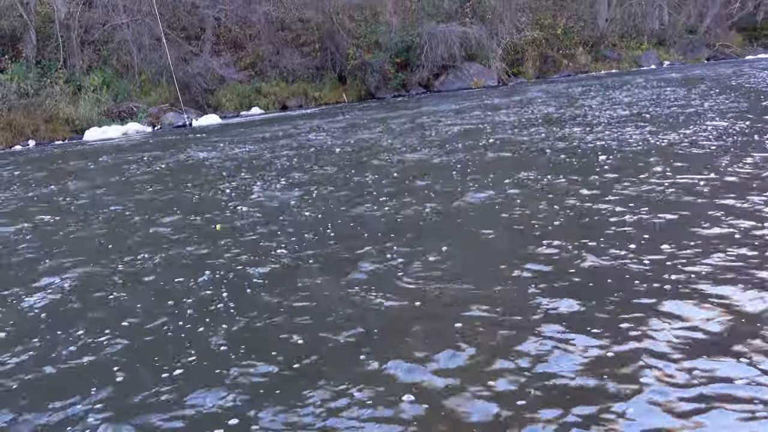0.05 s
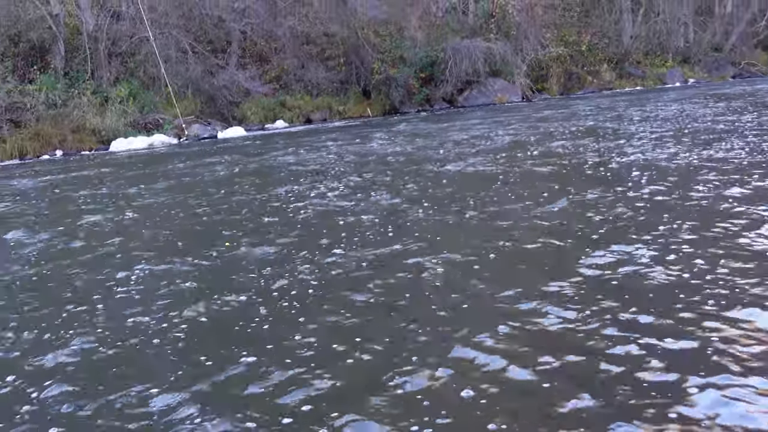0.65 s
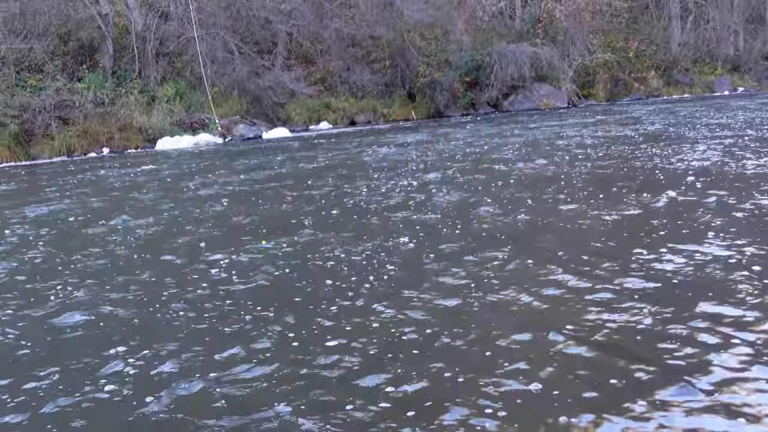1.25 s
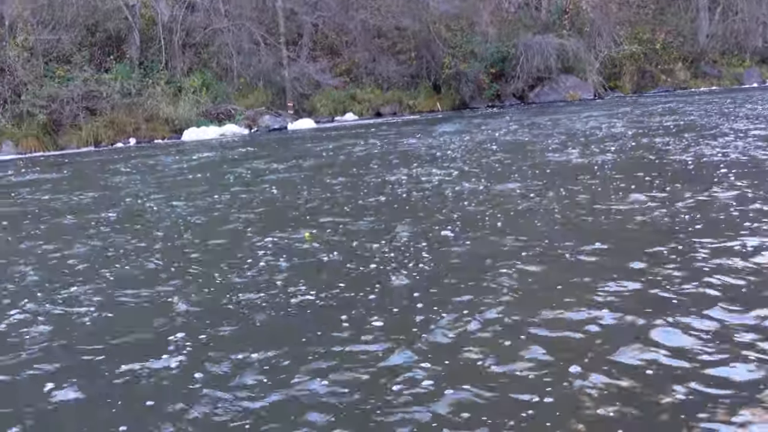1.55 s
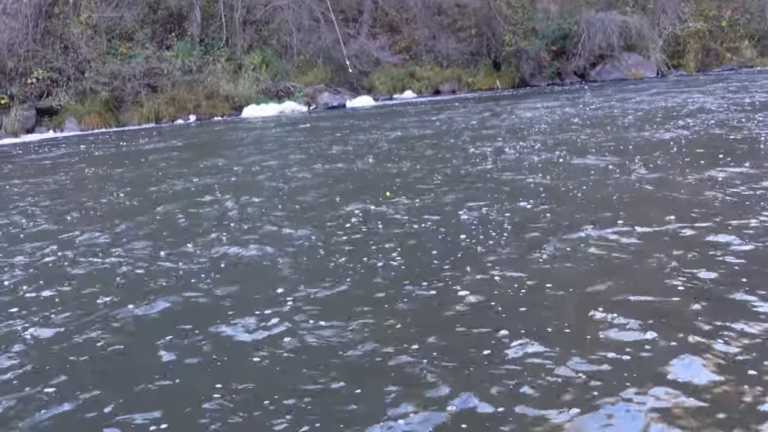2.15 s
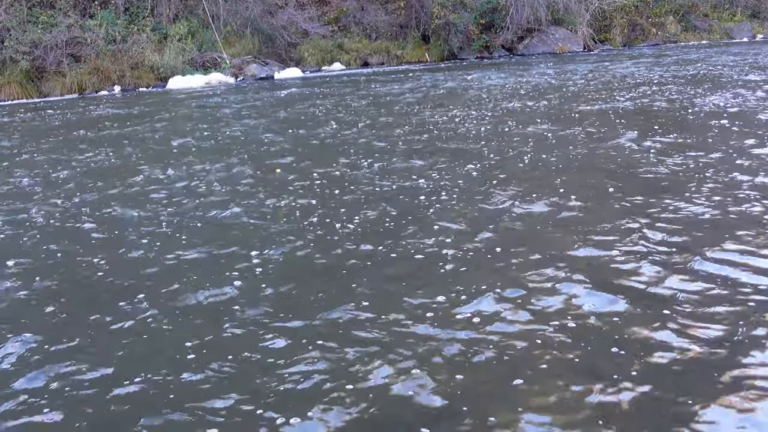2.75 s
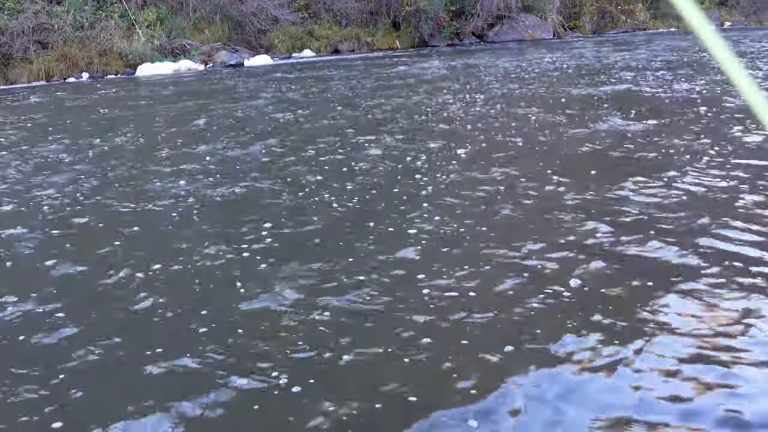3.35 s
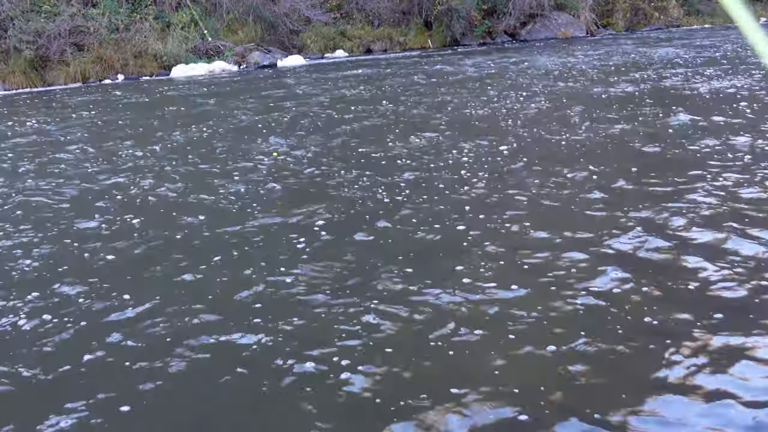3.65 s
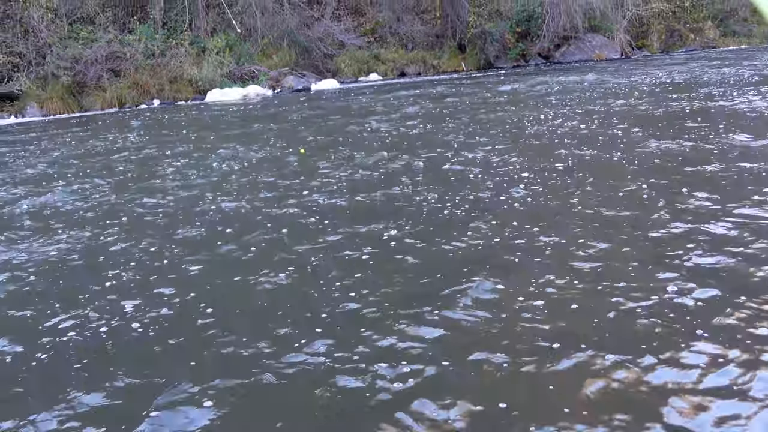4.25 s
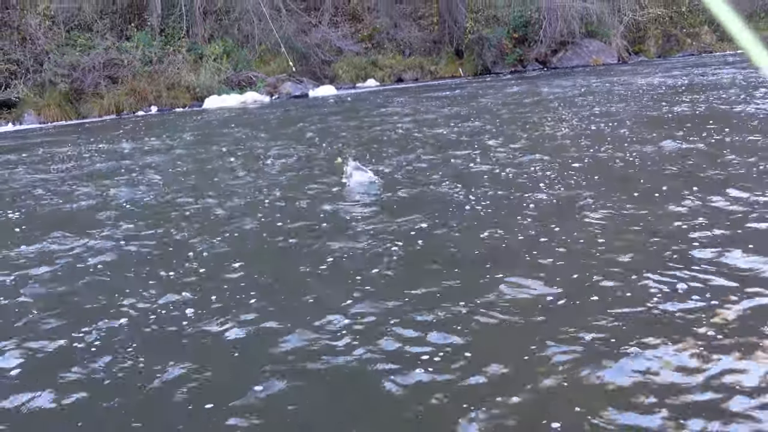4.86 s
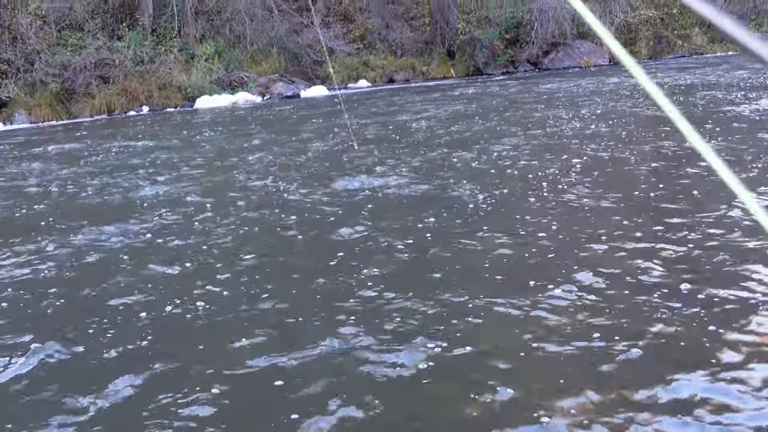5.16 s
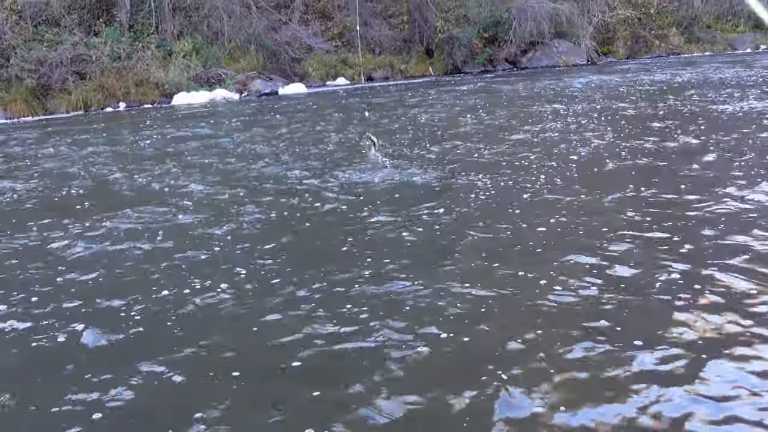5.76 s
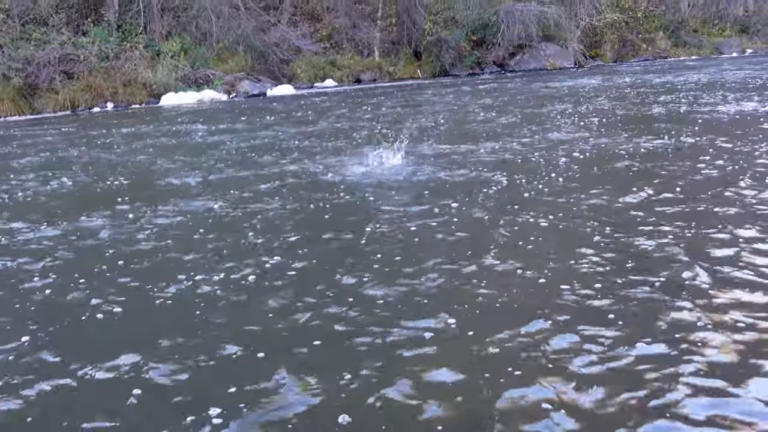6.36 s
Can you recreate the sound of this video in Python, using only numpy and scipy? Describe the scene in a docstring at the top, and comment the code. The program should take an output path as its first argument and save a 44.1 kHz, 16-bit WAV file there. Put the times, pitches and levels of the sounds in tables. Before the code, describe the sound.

A close fishing reel clicks and whirs in uneven spurts, then buzzes briefly before a fish splashes, over a soft river rush.

```python
"""River rush and a low breeze, then the clicking drag of a close spinning reel: an angler plays a fish.
The pawl snaps off each tooth as the spool slips, gears whir while the handle turns, the rotor knocks.
Near the end the fish takes line in one run, so fast that the clicks merge into a buzz, then splashes.
Air pockets plop in the churned water; small bubbles lap at the bank."""
import sys
import numpy as np
from scipy import signal
from scipy.fft import rfft, irfft, next_fast_len
from scipy.io import wavfile
from scipy.ndimage import uniform_filter1d

SR = 44100
rng = np.random.default_rng(int(sys.argv[2]) if len(sys.argv) > 2 else 0)


def wrap_up_sound(samples):
    """Save the sound to the file named by the first command line argument, as 16-bit audio."""
    columns = np.atleast_2d(samples).T
    # keep every value between -1 and 1, then stretch to whole-number steps
    tamed = np.clip(columns, -1, 1)
    steps = np.round(tamed * 32767).astype(np.int16)
    wavfile.write(sys.argv[1], SR, steps)


N = 287443
TIME = np.arange(N) / SR
ATTACK = slice(0, 132)  # first 3 ms; sets a click's level
USUAL_TEETH_PER_S = 59.3


# pawl snap spectrum: freq_hz, density_db
SNAP_SPECTRUM = [(700, -39), (2000, -16), (3200, -1), (4300, 0), (6500, 11), (8600, 3.5), (10500, 5.5),
                 (12600, 7), (14000, -1), (15300, 1), (17000, -9)]
# spool ring: freq_hz, level_db, t60_s
SPOOL_MODES = [(4750, -21.5, 0.0086), (5462, 6.5, 0.0042), (6050, -5, 0.0032)]
# light metal parts: freq_hz, level_db, t60_s
METAL_MODES = [(2396, -14.5, 0.04), (3070, -13.5, 0.05), (5200, -15, 0.03), (7000, -20, 0.03),
               (7680, 2, 0.015), (9200, -19, 0.04), (11300, -17, .02), (13870, -10.5, 0.028)]

def click(ring_db, snap_db, tilt_db, tune, scrape_s=0.00097, metal_db=-4):
    """The pawl drops off a tooth: a scraping snap, a ring of the spool, a faint shimmer of metal."""
    t = np.arange(1600) / SR
    contact = .36 * rng.standard_normal(len(t)) * np.exp(-t / scrape_s)
    contact[0] += 1
    snap = coloured(contact, SNAP_SPECTRUM)
    ring = struck(SPOOL_MODES, t * tune * rng.normal(1, .016), tilt_db, spread_db=3)
    ring *= 1 - np.exp(-t / .0004)
    metal = gain_of(metal_db) * struck(METAL_MODES, t * rng.normal(1, .004), tilt_db=0, spread_db=5)
    pawl = snap / snap[ATTACK].std() + metal
    return gain_of(ring_db) * ring / ring[ATTACK].std() + gain_of(snap_db) * pawl


# four spells of winding, one curve each: time_s, teeth_per_s, ring_db, ring_hz
WINDING_SPELLS = [
    [(0.9449, 111.9, -24.0, 5340), (0.991, 187.5, -30.0, 5460), (1.0061, 137.2, -22.5, 5540),
     (1.0206, 97.1, -33.5, 5430), (1.0526, 28.4, -21.5, 5720), (1.1441, 57.6, -25.5, 5760),
     (1.2065, 54.5, -27.0, 5780), (1.2888, 40.1, -36.0, 5810), (1.4172, 96.2, -33.0, 5790),
     (1.4313, 50.4, -23.5, 5460)],
    [(1.6549, 28.3, -34.0, 5750), (1.7106, 189.3, -28.5, 5450), (1.7375, 181.7, -28.0, 5630),
     (1.7934, 39.4, -27.5, 5460), (1.8268, 30.7, -15.5, 5740), (1.8879, 122.0, -40.5, 5500),
     (1.9517, 73.3, -32.5, 5620), (1.9721, 58.3, -37.5, 5670), (2.0573, 58.4, -31.5, 5640),
     (2.0715, 23.7, -25.5, 5550), (2.1519, 22.9, -24.0, 5530)],
    [(2.2788, 83.5, -31.0, 5690), (2.3111, 112.9, -35.0, 5590), (2.3463, 47.3, -29.5, 5370),
     (2.4676, 44.3, -28.0, 5410), (2.5052, 86.0, -31.5, 5330), (2.5677, 106.7, -30.0, 5500),
     (2.7023, 33.4, -34.5, 5580), (2.7421, 63.3, -34.0, 5790), (2.7941, 32.9, -33.5, 5710),
     (2.8133, 34.1, -42.0, 6110), (2.9087, 34.5, -24.0, 5570), (2.943, 36.3, -36.5, 5260),
     (2.9729, 37.9, -24.5, 5520)],
    [(3.0625, 29.8, -25.0, 5530), (3.1223, 62.1, -31.5, 5410), (3.2018, 20.1, -27.5, 5300),
     (3.2669, 47.6, -27.0, 5350), (3.2867, 33.8, -27.0, 5320), (3.3942, 87.1, -30.5, 5170),
     (3.4639, 71.2, -20.0, 5900), (3.5853, 49.1, -38.0, 5550), (3.5994, 63.8, -39.5, 5710),
     (3.6816, 30.7, -32.5, 5690), (3.7624, 35.8, -38.0, 5940), (3.7812, 25.1, -24.0, 5560),
     (3.8486, 55.8, -33.5, 5450), (3.8947, 35.3, -26.0, 5500)],
]

def drag(usual_ring_db=-27, usual_ring_hz=5402, usual_snap_db=-31.5, ring_trim_db=0.5, uneven_db=1.5):
    """The spool slips, one click per tooth; the snap is harder with louder ring and higher speed."""
    out = np.zeros(N)
    for spell in WINDING_SPELLS:
        teeth, speed, ring_db, ring_hz = spool_motion(spell)
        snap_db = usual_snap_db + 0.29 * (ring_db - usual_ring_db) + 1.5 * doublings(speed)
        tune = ring_hz / usual_ring_hz
        for i in np.flatnonzero(teeth):
            tooth = click(ring_db[i] + ring_trim_db, snap_db[i], tilt_db=4, tune=tune[i])
            add(out, TIME[i], gain_of(uneven_db * rng.standard_normal()) * tooth)
    return out


# spool during the run: time_s, teeth_per_s, level_db
RUN_MOTION = [(5.3666, 73.7, -25), (5.399, 145.5, -27), (5.424, 146.4, -33.5), (5.452, 121.8, -25.5),
              (5.49, 192.2, -25), (5.53, 316.1, -26), (5.565, 287.9, -26.5), (5.595, 199.4, -27.5),
              (5.607, 167.3, -36), (5.628, 131.4, -25.5), (5.655, 136.4, -26), (5.699, 211.4, -24.5),
              (5.74, 158.2, -24.5), (5.7925, 74.7, -24.5)]
# swinging ring of the spool: time_s, pitch_hz
RUN_RING = [(5.37, 5440), (5.41, 5860), (5.45, 5200), (5.5, 5800), (5.53, 5100), (5.59, 5660),
            (5.635, 5200), (5.68, 5700), (5.72, 5230), (5.79, 5430)]
# spinning spool spectrum: freq_hz, density_db
BUZZ_SPECTRUM = [(900, -24), (3300, -21.5), (3950, -5.5), (4500, 0.5), (5400, 2), (5950, -1.5),
                 (7000, -12.5), (7700, -8.5), (8750, -23), (9150, -6.5), (9900, -17.5), (13000, -17),
                 (16000, -27)]

def fish_run(trim_db=-5, uneven_db=0.8, paths_db=-14):
    """The spool spins; clicks merge into a buzz whose pitch follows its speed."""
    teeth, _, level_db = spool_motion(RUN_MOTION)
    blows = teeth * gain_of(level_db + trim_db + uneven_db * rng.standard_normal(N))
    # paths through the turning spool come and go, so the treble shifts
    paths = np.zeros(N)
    for lag in range(5, 90, 8):
        paths += drift(30) * np.roll(blows, lag + rng.integers(8))
    treble = gain_of(paths_db) * np.diff(paths, prepend=0)
    tooth_rms = coloured(signal.unit_impulse(SR), BUZZ_SPECTRUM)[ATTACK].std()
    buzz = coloured(blows + treble, BUZZ_SPECTRUM) / tooth_rms
    ring_hz = np.interp(TIME, *np.transpose(RUN_RING))
    return buzz + resonate(buzz, ring_hz, width_hz=400)


# lone teeth, handle at rest: start_s, ring_db
SLIPS = [(0.4388, -25.5), (4.0157, -22.5), (5.8044, -28), (5.837, -26.5), (5.999, -25.5)]

def slips():
    """A tug on the line pulls one tooth past the pawl: a dry tick."""
    out = np.zeros(N)
    for start_s, ring_db in SLIPS:
        tick = click(ring_db, snap_db=ring_db - 9, tilt_db=0, tune=0.999, scrape_s=0.0013, metal_db=-6)
        add(out, start_s, tick)
    return out


# rotor knocks: start_s, level_db, tune_ratio, bail_db
KNOCKS = [(0.9305, -22.5, 0.92, 14), (1.2538, -40.5, 0.91, -1), (1.444, -43, 0.9, -12),
          (1.571, -27, 0.95, 2), (2.2579, -21.5, 0.997, 8), (2.941, -38.5, 0.96, 11),
          (5.343, -40, 0.97, -1), (5.587, -36.5, 1, -15)]
# reel body: freq_hz, width_hz, level_db
BODY_MODES = [(1214, 107, 1), (2210, 230, -0.5), (3310, 310, 1), (5240, 900, 6), (7500, 1200, -1.5)]

def rotor_knocks(push_s=0.0075, tail_db=-11, tail_s=0.017, bail_hz=4260, bail_width_hz=300):
    """The rotor takes up its play: brief chatter shakes the reel's body and bail."""
    t, out = np.arange(SR // 16) / SR, np.zeros(N)
    push = np.sin(np.pi * np.minimum(t / push_s, 1)) + gain_of(tail_db) * np.exp(-t / tail_s)
    for start_s, level_db, tune, bail_db in KNOCKS:
        chatter = push * rng.standard_normal(len(t))
        knock = np.zeros(len(t))
        for hz, width_hz, mode_db in [*BODY_MODES, (bail_hz, bail_width_hz, bail_db)]:
            mode = np.exp(-np.pi * width_hz * t) * np.cos(2 * np.pi * hz * tune * t)
            knock += gain_of(mode_db) * unit_rms(signal.fftconvolve(chatter, mode)[:len(t)])
        knock = coloured(knock, [(780, -7), (1130, 3), (7500, -1.5), (13000, -16.5)])
        add(out, start_s, gain_of(level_db) * knock / knock[:SR // 100].std())
    return out


# gear whir spectrum: freq_hz, density_db
GEAR_SPECTRUM = [(1200, -2.5), (2700, -1.5), (3080, 5), (3550, 6.5), (4600, 9), (5200, 7.5), (5750, 5),
                 (6400, 3.5), (8500, -14), (16000, -19)]

def gears(usual_db=-48, db_per_doubling=4.5, ease_s=0.013, flutter_db=4.5):
    """Meshing gears and line on the roller: an uneven whir that grows with winding speed."""
    speed = sum(spool_motion(spell)[1] for spell in WINDING_SPELLS)
    level = (speed > 0) * gain_of(usual_db + db_per_doubling * doublings(speed))
    level = uniform_filter1d(level, round(ease_s * SR)) * gain_of(flutter_db * drift(150))
    return level * noise(GEAR_SPECTRUM)


# fish splashes: start_s, level_db, fall_s
SPLASHES = [(0.304, -54, 0.6), (4.689, -40.5, 0.011), (4.967, -47.5, 0.4), (6.126, -39.5, 0.015),
            (6.174, -42, 0.015), (6.208, -45.5, 0.17), (6.315, -44.5, 0.064), (6.359, -41, 0.027),
            (6.376, -47, 0.36), (6.484, -42, 0.0087)]
# drop and spray spectrum: freq_hz, density_db
SPRAY_SPECTRUM = [(300, -1.5), (700, 2.5), (1700, -7), (2400, -1), (5200, -4), (6500, -9.5), (7500, -9.5),
                  (16000, -18)]

def splashes(fall_db=16, drops_db=-1, spray_db=-6, ring_cycles=5):
    """Each splash is a dying shower: briefly ringing drops in a fine spray."""
    t, level, drops = np.arange(SR // 2) / SR, np.zeros(N), np.zeros(N)
    for start_s, level_db, fall_s in SPLASHES:
        add(level, start_s, gain_of(level_db - fall_db * t / fall_s))
    for hz in np.geomspace(700, 7500, num=24):
        drop = np.sin(2 * np.pi * hz * t) * np.exp(-hz * t / ring_cycles)
        drops += unit_rms(sprinkle(drop, per_s=22, size_db=5)) * np.sqrt(hz)
    drops = unit_rms(coloured(drops, SPRAY_SPECTRUM))
    return level * (gain_of(drops_db) * drops + gain_of(spray_db) * noise(SPRAY_SPECTRUM))


# air pockets: start_s, level_db, pitch_hz, glide_octaves_per_s
PLOPS = [(1.304, -33.5, 406, -9), (1.319, -40.5, 153, -8), (1.373, -35, 418.8, -11),
         (4.338, -40.5, 1065, -3), (6.323, -42.5, 694, 6), (6.444, -33.5, 744, 8.5)]

def plops(rise_s=0.00053, fall_s=0.022):
    """Air pockets close in churning water, so their note is ragged."""
    t, out = np.arange(SR // 8) / SR, np.zeros(N)
    swell = (1 - np.exp(-t / rise_s)) * np.exp(-t / fall_s)
    for start_s, level_db, pitch_hz, glide in PLOPS:
        churn = .65 + .45 * (drift(170) + 1j * drift(170))[:len(t)]
        phase = 2 * np.pi * np.cumsum(pitch_hz * 2 ** (glide * t)) / SR
        note = (churn * np.exp(1j * phase)).real
        add(out, start_s, gain_of(level_db) * swell / swell.max() * note)
    return out


# river rush spectrum: freq_hz, density_db
RIVER_SPECTRUM = [(20, -18), (110, -6.5), (190, -5.5), (300, -2), (450, 1), (800, 0), (1200, -1),
                  (1700, -6.5), (3000, -11), (5500, -17), (7000, -20.5), (16000, -24)]

def river(rush_db=-50.5, waver_db=0.39, lap_relative_db=-7):
    """A steady rush, with small bubbles lapping near the bank."""
    t, bubbles = np.arange(SR // 25) / SR, np.zeros(N)
    for hz in np.geomspace(330, 1400, num=20):
        bubble = np.sin(2 * np.pi * hz * t * (1 + 2 * t)) * np.exp(-hz * t / 5)
        bubbles += sprinkle(bubble, per_s=7, size_db=5.1)
    rush = noise(RIVER_SPECTRUM) * gain_of(waver_db * drift(2.1))
    return gain_of(rush_db) * (rush + gain_of(lap_relative_db) * unit_rms(bubbles))


# breeze strength: time_s, level_db
BREEZE_LEVEL = [(0, -35.5), (.3, -38), (1.66, -43), (2.0, -45.5), (2.5, -51.5), (2.7, -37), (3.05, -45),
                (3.7, -43), (4.0, -51), (4.35, -40), (5.2, -51.5), (5.7, -36.5), (6.5, -43.5)]
# wind rumble spectrum: freq_hz, density_db
RUMBLE_SPECTRUM = [(12, -5.5), (26, -2), (44, 2), (65, -10.5), (100, -22), (200, -53)]

def breeze(gust_db=3):
    """Gusts press on the microphone: a lumpy low rumble."""
    level_db = np.interp(TIME, *np.transpose(BREEZE_LEVEL)) + gust_db * drift(4.2)
    return gain_of(level_db) * noise(RUMBLE_SPECTRUM)


def reflections(x, level_db=-15, t60_s=0.019):
    """Rod, hands and stony bank scatter a short faint tail."""
    t = np.arange(SR // 16) / SR
    taps = rng.standard_normal(len(t)) * gain_of(-60 * t / t60_s) * (t > .001)
    taps = coloured(taps, [(5000, 3.5), (10000, -6)])
    return gain_of(level_db) * signal.oaconvolve(x, taps / np.linalg.norm(taps))[:N]


def spool_motion(curve):
    """Per sample: 1 where a tooth passes the pawl, teeth per s, then the curve's other columns."""
    time_s, speed, *controls = np.transpose(curve)
    speed = np.interp(TIME, time_s, speed, left=0, right=0)
    teeth = np.diff(np.ceil(np.cumsum(speed) / SR), prepend=0)
    return [teeth, speed] + [np.interp(TIME, time_s, control) for control in controls]


def doublings(speed):
    """Octaves above the usual spool speed."""
    return np.log2(np.maximum(speed, 1) / USUAL_TEETH_PER_S)


def struck(modes, t, tilt_db, spread_db):
    """Dying modes, tilted by tilt_db per octave, weighted anew at each blow."""
    hz, db, t60_s = np.transpose(modes)[:, :, None]
    db = db + tilt_db * np.log2(hz / hz.mean()) + spread_db * rng.standard_normal(db.shape)
    return (gain_of(db - 60 * t / t60_s) * np.sin(2 * np.pi * hz * t)).sum(0)


def resonate(x, hz, width_hz):
    """Unity-gain resonance that follows the curve hz."""
    carrier = np.exp(2j * np.pi * np.cumsum(hz) / SR)
    pole = np.exp(-np.pi * width_hz / SR)
    return 2 * (carrier * signal.lfilter([1 - pole], [1, -pole], x / carrier + 1e-18)).real


def coloured(x, spectrum):
    """Minimum-phase filter; attacks stay sharp."""
    size = 2 * next_fast_len(len(x))
    hz, db = np.transpose(spectrum)
    bin_hz = abs(np.fft.fftfreq(size, 1 / SR))
    log_gain = np.log(gain_of(np.interp(np.log(bin_hz + 1), np.log(hz), db)))
    response = np.exp(np.conj(signal.hilbert(log_gain)))[:size // 2 + 1]
    return irfft(rfft(x, size) * response)[:len(x)]


def sprinkle(sound, per_s, size_db):
    """Repeats a sound at random times and levels."""
    births = (rng.random(N) < per_s / SR) * gain_of(size_db * np.minimum(rng.exponential(1, N), 3))
    return signal.oaconvolve(births, sound)[:N]


def noise(spectrum):
    """Coloured noise, rms 1."""
    return unit_rms(coloured(rng.standard_normal(N), spectrum))


def drift(top_hz):
    """Random wander below top_hz, rms 1."""
    return unit_rms(irfft(rfft(rng.standard_normal(N)) * (np.fft.rfftfreq(N, 1 / SR) < top_hz), N))


def gain_of(db):
    """Decibels to amplitude."""
    return 10 ** (np.asarray(db) / 20)


def unit_rms(x):
    """Scales to rms 1."""
    return x / np.sqrt(np.mean(x ** 2) + 1e-20)


def add(mix, start_s, sound):
    """Mixes a sound in at start_s."""
    part = mix[max(round(start_s * SR), 0):][:len(sound)]
    part += sound[:len(part)]


def scene():
    """The reel in front of the river, mono."""
    outdoors = river() + breeze() + splashes() + plops()
    reel = drag() + rotor_knocks()
    return (reel + reflections(reel) + fish_run() + slips() + gears() + outdoors)[None]


def record(dry):
    """Low-pass at 16.1 kHz."""
    lowpass = signal.firwin(255, 16100, window=("kaiser", 9), fs=SR)
    return signal.oaconvolve(dry, lowpass[None], "same")


dry = scene()
out = record(dry)
wrap_up_sound(out)
```